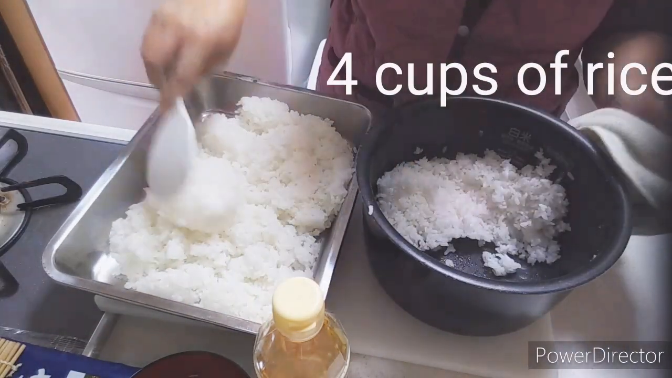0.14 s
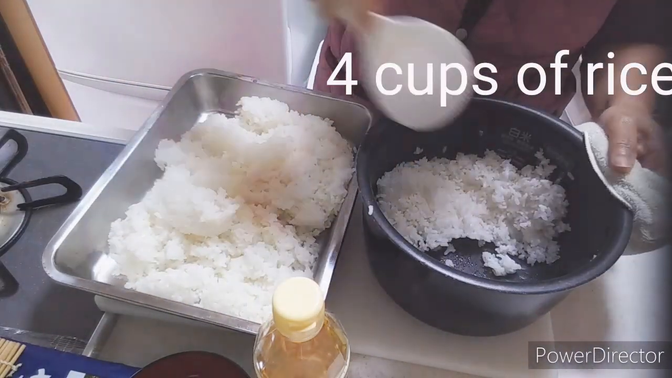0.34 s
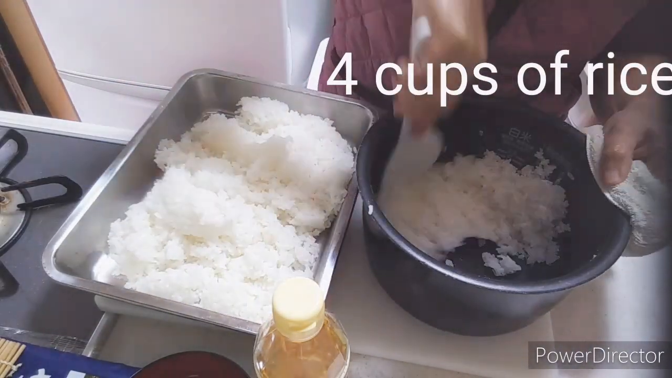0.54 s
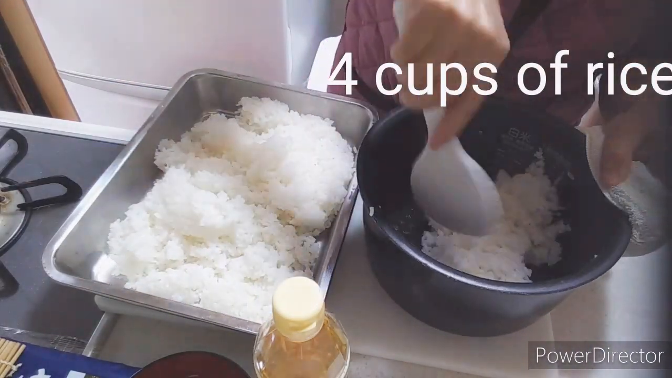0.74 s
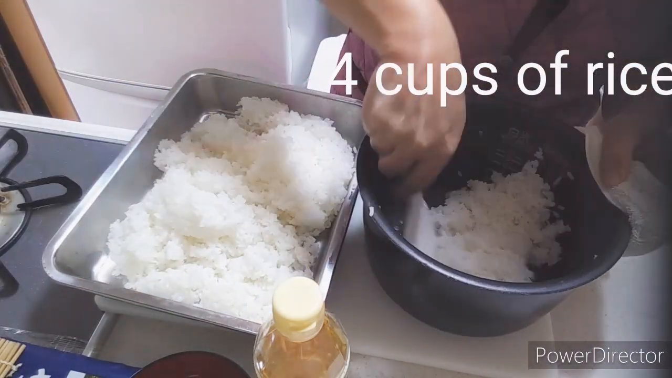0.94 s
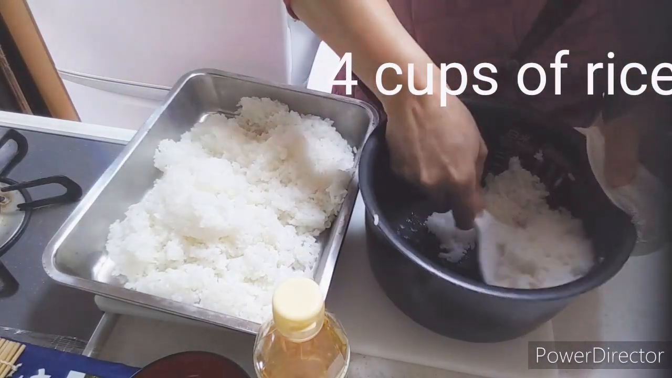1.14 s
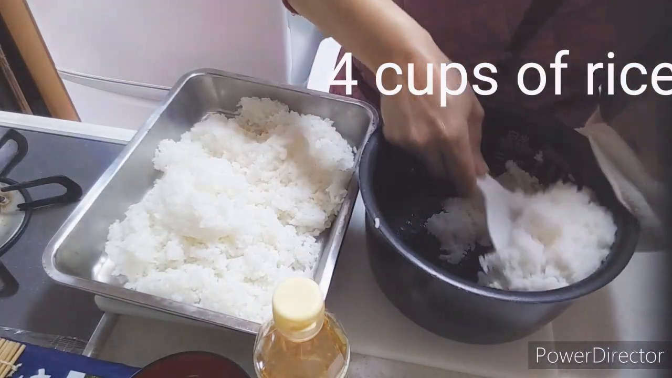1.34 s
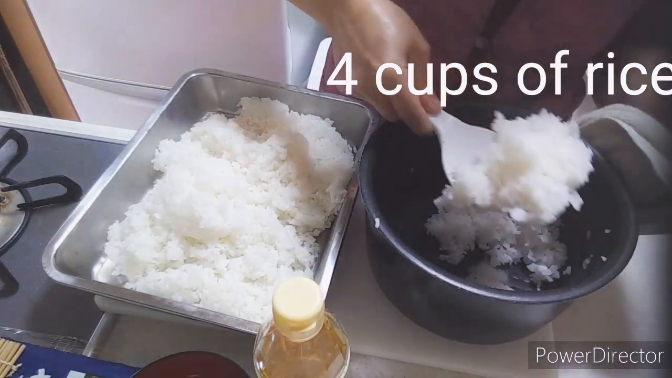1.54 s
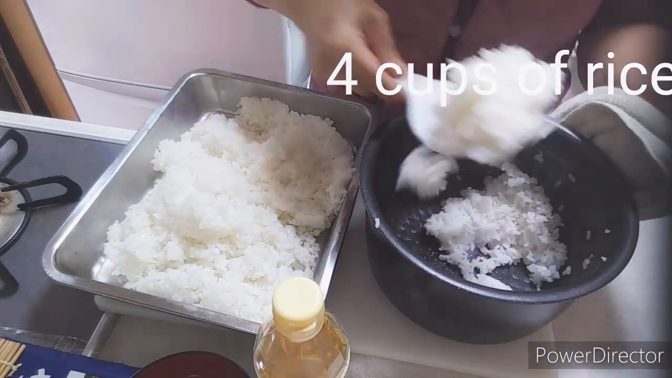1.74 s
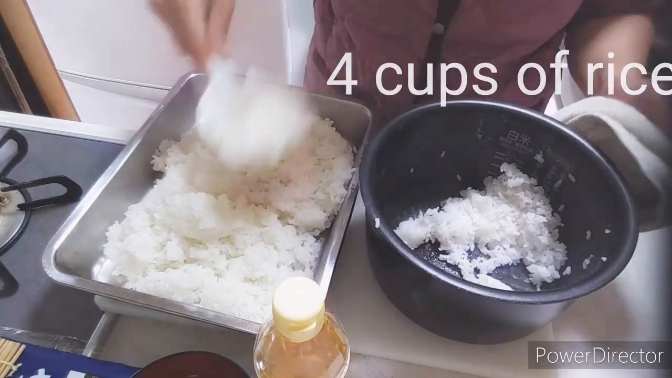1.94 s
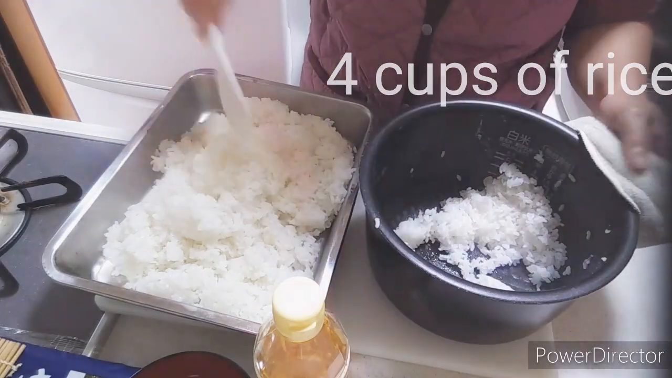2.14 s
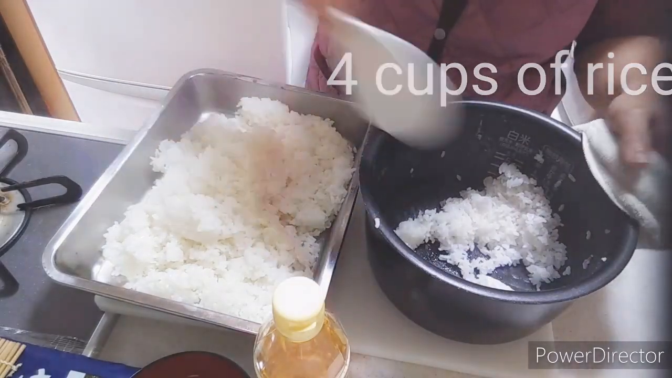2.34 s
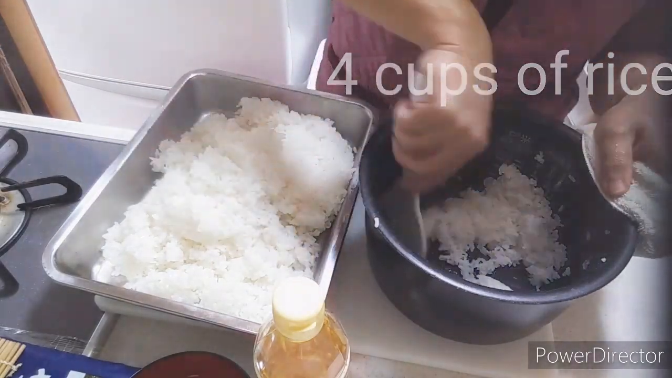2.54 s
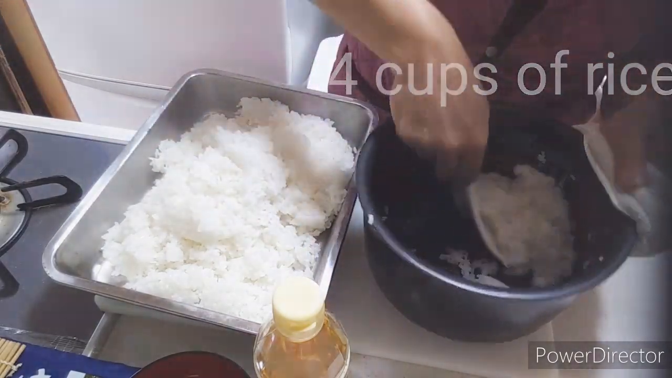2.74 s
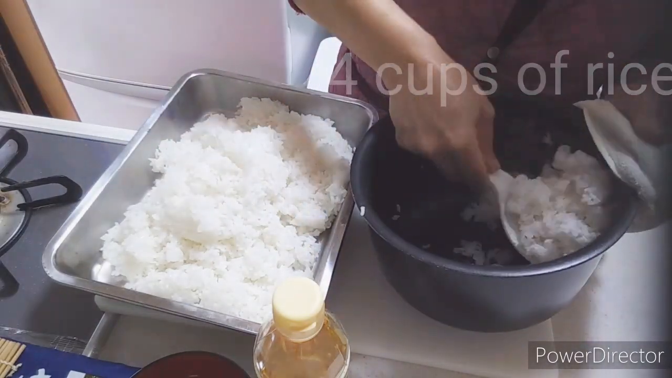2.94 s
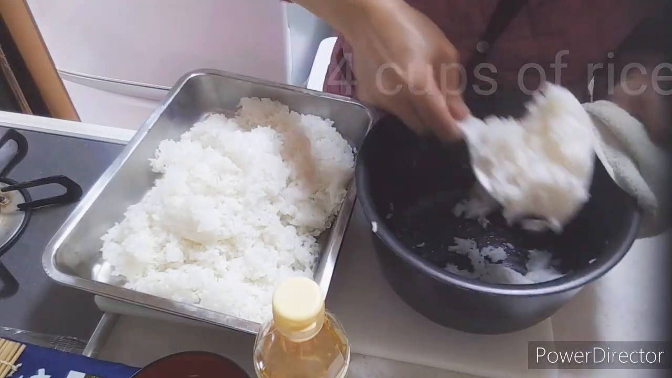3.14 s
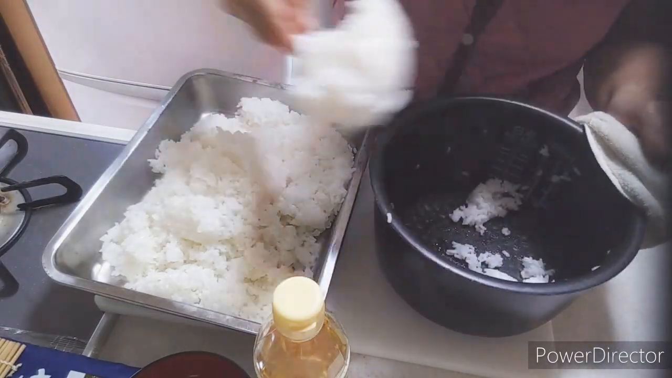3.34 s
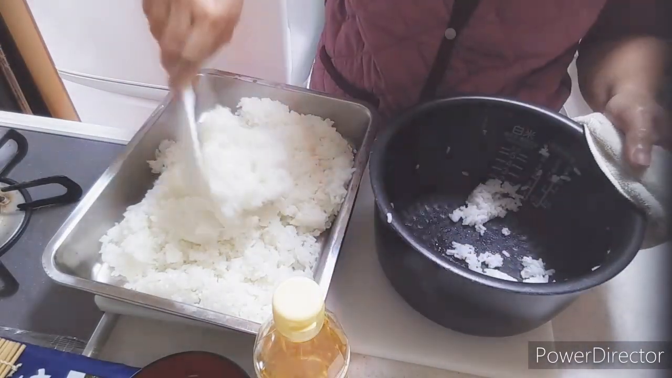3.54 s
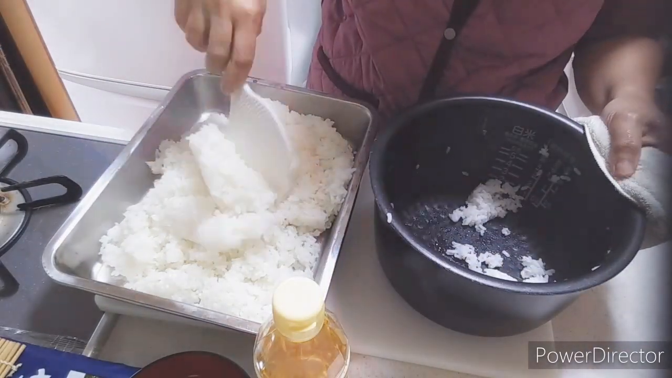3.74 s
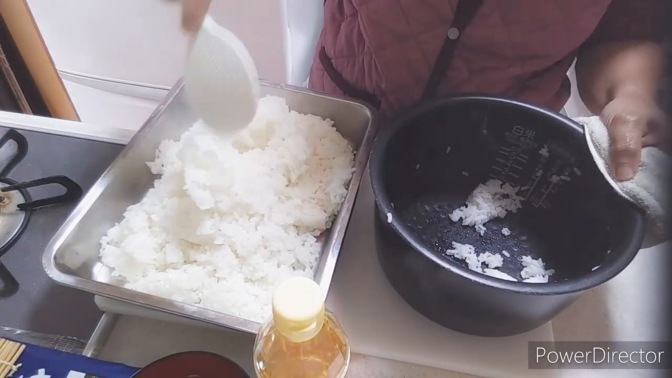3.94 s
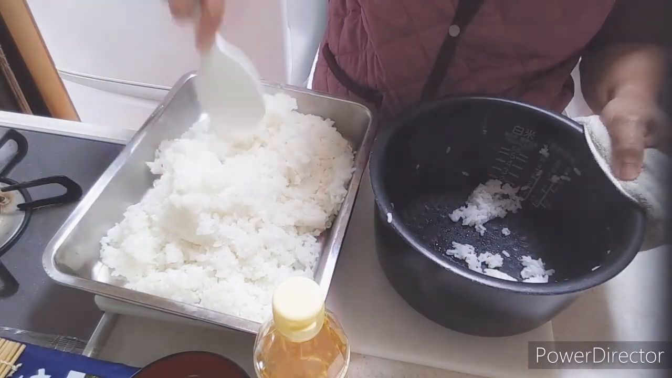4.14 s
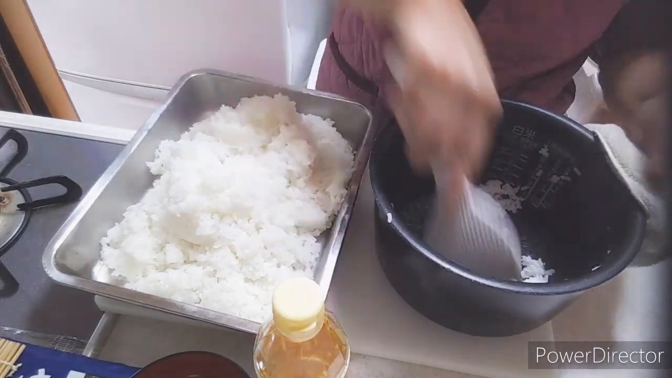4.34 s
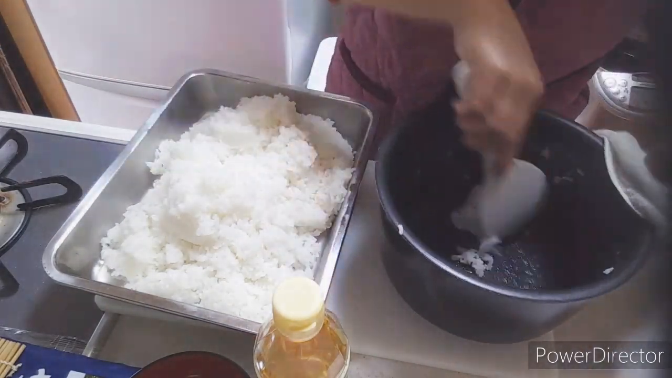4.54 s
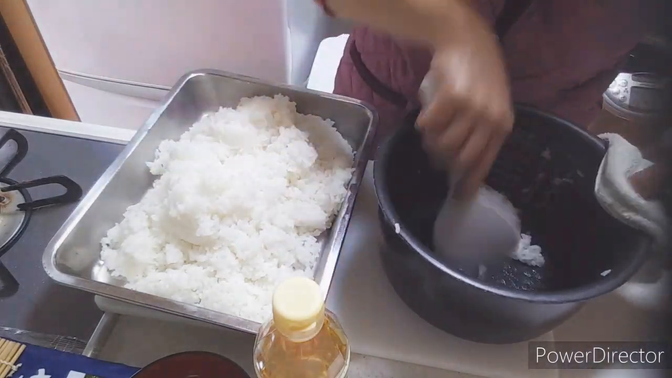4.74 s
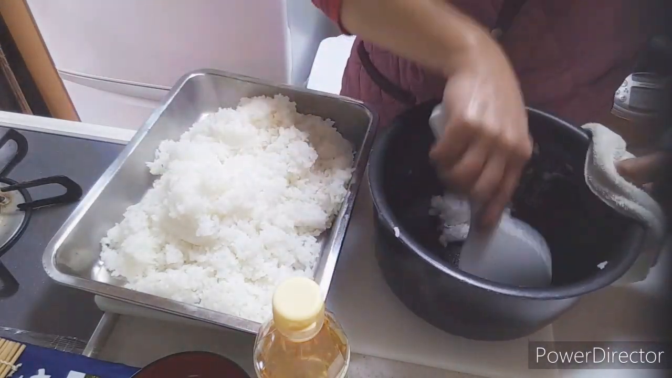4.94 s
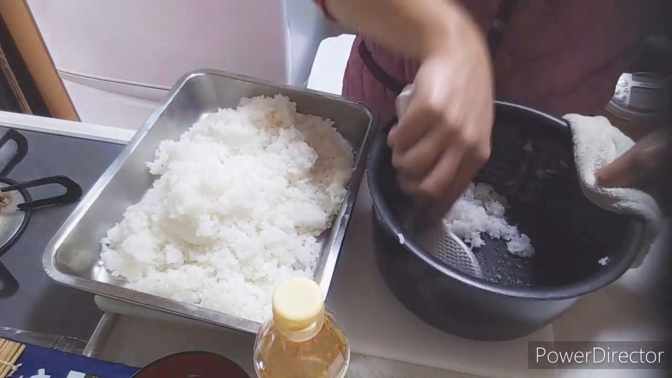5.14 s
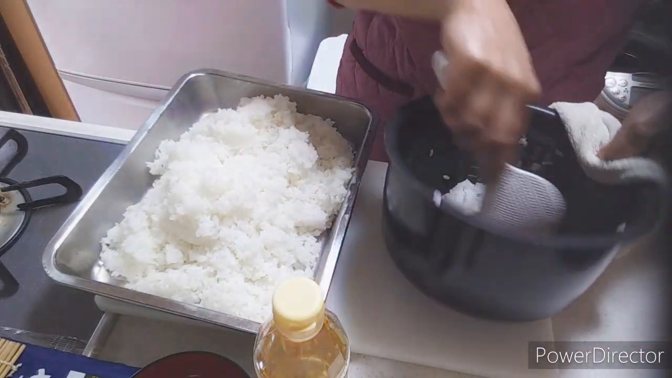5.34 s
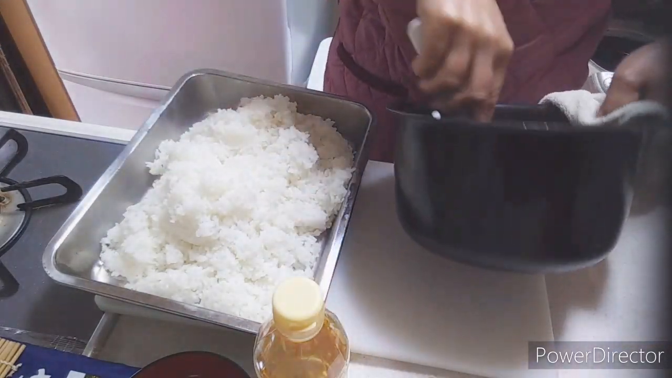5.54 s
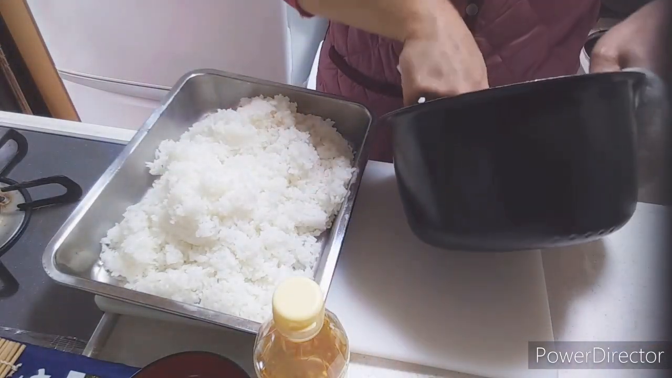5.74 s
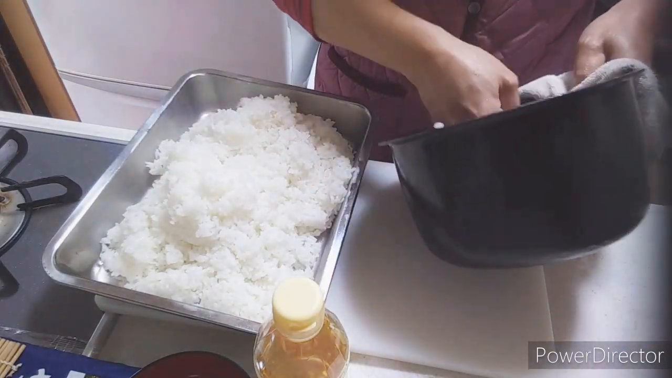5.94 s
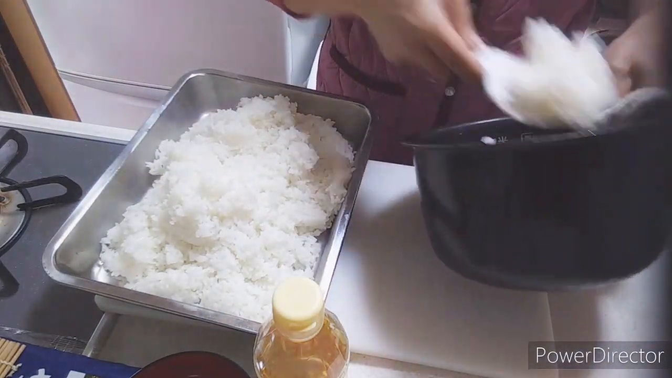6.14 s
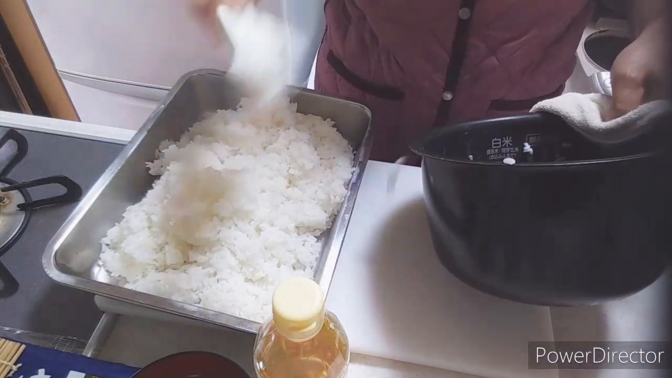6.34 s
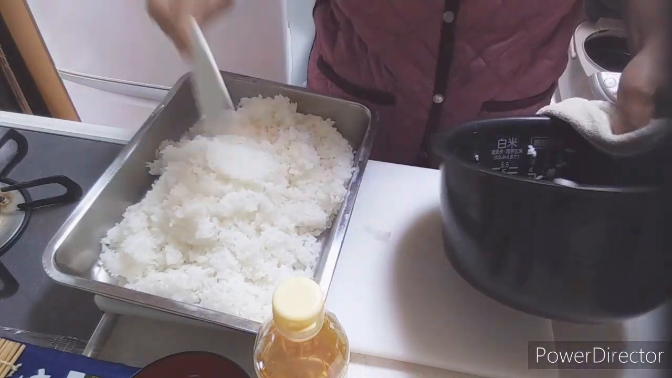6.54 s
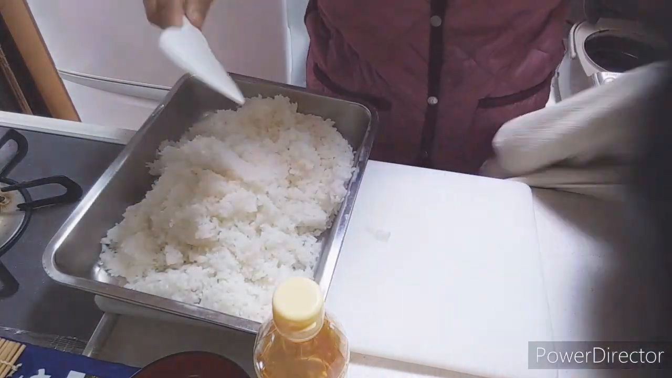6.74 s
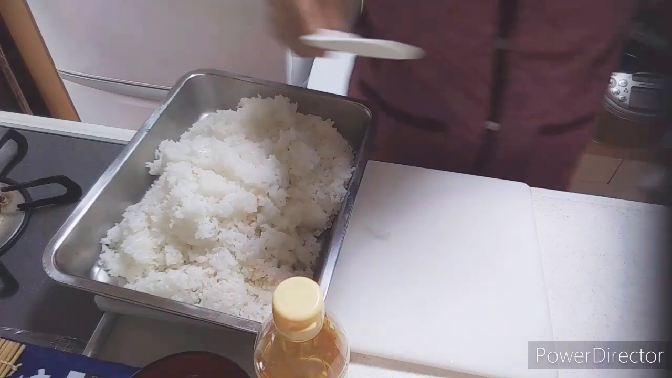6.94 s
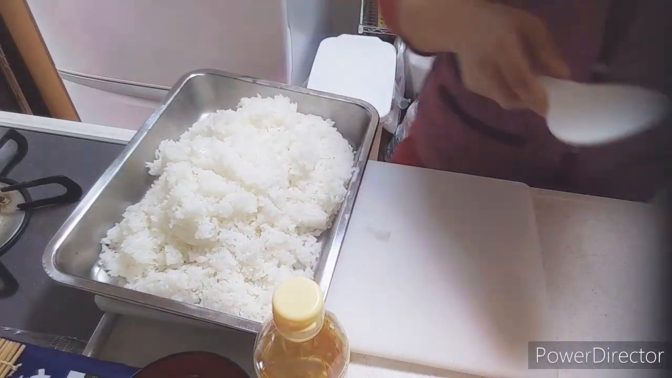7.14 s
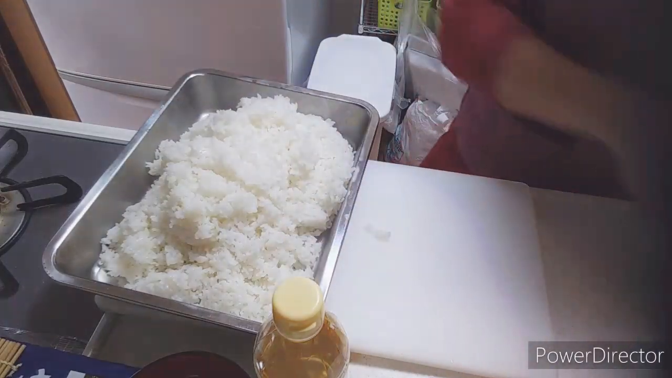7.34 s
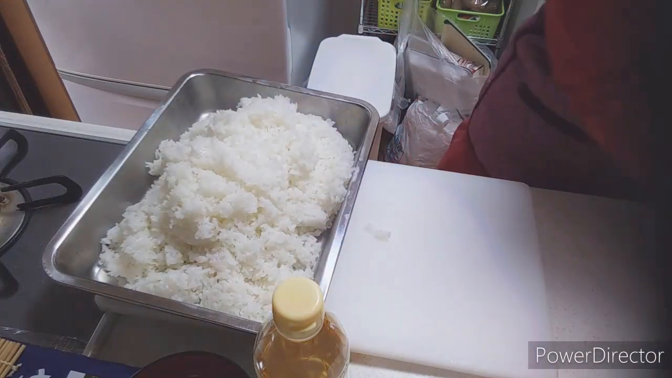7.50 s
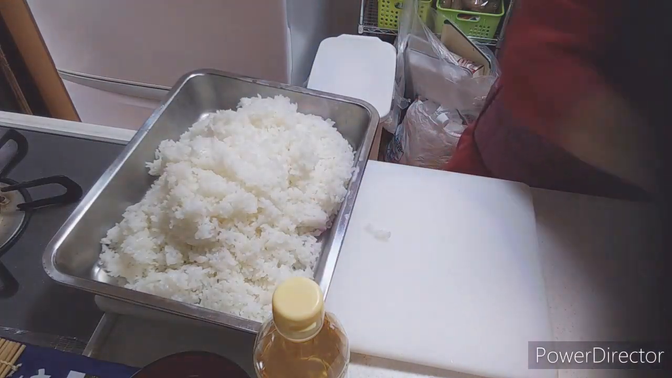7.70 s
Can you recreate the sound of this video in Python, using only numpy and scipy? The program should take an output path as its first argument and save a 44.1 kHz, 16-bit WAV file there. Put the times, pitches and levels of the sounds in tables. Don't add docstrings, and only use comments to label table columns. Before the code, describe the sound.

A plastic rice paddle knocks and scrapes in a hollow metal pot, which rings when lifted, then heavy thuds and a last bright clank.

```python
import sys
import numpy as np
from scipy import signal
from scipy.fft import rfft, irfft
from scipy.io import wavfile
from scipy.ndimage import uniform_filter1d

SR = 44100
rng = np.random.default_rng(int(sys.argv[2]) if len(sys.argv) > 2 else 0)


def master_out(mix):
    frames = np.transpose(np.atleast_2d(mix))
    ceiling = np.clip(frames, -1, 1)
    pcm = np.round(ceiling * 32767).astype(np.int16)
    wavfile.write(sys.argv[1], SR, pcm)


def undo_db(level):
    steps = np.asarray(level, float) / 20
    return 10 ** steps


N = 347059

# (f/Hz, level/dB)
HISS_SHAPE = [(18, -48), (30, -20.5), (49, -32.5), (144, -16), (225, 1.5), (443, -9.5), (546, -11.5),
              (709, -1.5), (1260, -3), (1360, -6.5), (1680, -4.5), (10700, -12), (12600, -14.5),
              (14300, -8), (15500, -6)]
HISS_DB = -62.5

# (start t/s, held/s, pressure/dB, rustle re scrape/dB)
STROKES = [(0.0, 0.016, -68.5, 4.5), (0.64, 0.1, -59.5, 5), (1.05, 0.49, -66, 3.5), (1.66, .5, -72.5, -19),
           (2.32, 0.34, -84, 15), (2.62, .55, -66, 4.5), (2.94, 0.047, -64.5, -15), (4.2, .3, -78, 11.5),
           (4.57, 0.077, -58.5, 2.5), (4.87, 0.032, -61.5, 1), (5.12, 0.033, -62.5, 6),
           (5.35, 0.069, -65.5, -3), (5.66, 0.034, -56.5, -19.5), (5.78, 0.11, -55.5, -15.5),
           (5.96, 0.147, -72.5, 11.5), (6.09, 0.039, -59.5, -8), (6.3, 0.2, -81, 14),
           (6.9, 0.077, -65, 7.5), (7.49, 0.06, -68, 15.5), (7.59, 0.092, -58, 4.5),
           (7.708, 0.18, -53, -10)]
PRESS_DB_PER_S, LET_GO_DB_PER_S = 133.5, 111
RUMBLE_DB, STILL_RUMBLE_DB = -1, -68
# (f/Hz, width/Hz, level/dB)
RUMBLE = [(161, 69, 2.7), (320, 113, 6.1), (449, 300, 2.8)]

# (f/Hz, width/Hz, level/dB)
HOLLOW = [(947, 84, -1.5), (1380, 190, 4), (1650, 430, 0), (2136, 120, 2.5), (2733, 470, -3.5),
          (3422, 74, -3), (4360, 990, -23.5), (5790, 370, -10.5)]
# (f/Hz, width/Hz, level/dB)
SHIMMER = [(6300, 900, -4), (7400, 700, -2.5), (9200, 900, 0), (10600, 1200, -4), (12700, 1500, -4),
           (14600, 1200, -4.5)]
WALL_HZ = [705, 915, 1954, 3477, 4926, 6140, 7267]
# (level/dB, t60/s)
WALL = [(-1.5, 0.16), (-9, 0.099), (-7.5, 0.25), (1.5, 0.098), (-3, 0.1), (-4.5, 0.15), (-9.5, .12)]
# (level/dB, t60/s)
FREE_WALL = [(3.5, 0.4), (-34, .3), (-32, 0.45), (7, 4.9), (4.5, 0.61), (-4, 0.81), (-15, .6)]
RIM_HZ = [8495, 9165, 9700, 10560, 11170, 11720, 12520, 12750, 13312, 14135, 14650, 15130]
# (level/dB, t60/s)
RIM = [(5, 0.064), (13, 0.038), (5.5, 0.062), (-7, 0.021), (-5.5, 0.1), (2, 0.051), (2, 0.083),
       (-10.5, 0.11), (-9, 0.057), (-1, 0.062), (-1, 0.09), (3, .07)]
LIFTED_HZ = [940, 1700, 1746, 1811, 1900, 2030, 3316, 5560, 5712, 5986, 6831, 8850, 9609, 10750, 12000,
             13510, 14600]
# (level/dB, t60/s)
LIFTED_WALL = [(-11, 0.06), (-17, 0.0084), (-18, 0.056), (8, 0.08), (-12, 0.21), (-20.5, 0.18), (-18, 0.13),
               (-13.5, 0.091), (-17, 0.12), (-24, 0.075), (-27, .07), (-40.5, 0.072), (-35, 0.071),
               (-38.5, .08), (-47.5, 0.082), (-37.5, 0.041), (-37.5, 0.088)]
RUBBED_HZ = [1830, 3300, 5560, 6820, 8580, 8850, 9460, 10700, 12000, 12600, 14400, 14600]
# (width/Hz, level/dB)
RUBBED_WALL = [(24.5, -3), (87, -13), (22.17, -12), (35, -26), (50.6, -26), (35.3, -24.5), (39.45, -27),
               (30, -29), (39.9, -25), (50, -29), (39.46, -29), (35.25, -27.5)]

# (t/s, clack level/dB, clack f/Hz, tick re clack/dB, clack t60/s)
RIM_BLOWS = [
    (0.608, -31, 2090, -2, 0.074),
    (0.657, -47.5, 1960, 9.5, 0.087),
    (1.362, -60.5, 2280, -1, 0.14),
    (3.159, -61, 1880, -1, 0.065),
    (7.767, -31.5, 3110, 7, 0.27),
]
# (t/s, clack level/dB, clack f/Hz, tick re clack/dB)
WALL_BLOWS = [(1.221, -50, 3070, -4.5), (1.945, -50.5, 3200, -8), (2.3, -56.5, 3100, -5),
              (2.6285, -34, 960, -6.5), (2.714, -30, 944, -12), (2.7555, -30.5, 1700, -13),
              (2.778, -41, 2200, -10), (2.858, -56, 1900, -9), (2.925, -75, 3200, 3),
              (3.84, -51.5, 1600, -1), (5.025, -52, 2240, -11.5), (5.086, -17.5, 937, -13),
              (5.089, -18.5, 2750, -36), (5.147, -31.5, 1640, -17), (5.157, -28.5, 1650, -9.5),
              (5.345, -25, 1820, -11.5), (5.354, -24.5, 1650, -31), (6.961, -46.5, 3010, -7.5)]
# (t/s, clack level/dB, clack f/Hz, tick re clack/dB)
BOTTOM_BLOWS = [(0.748, -40.5, 1220, -6), (0.763, -48, 1210, -2), (1.064, -35, 1620, -2),
                (1.0655, -31.5, 3280, -14.5), (1.075, -41, 3100, -20), (1.701, -41, 3110, -30),
                (4.565, -38.5, 2100, -10), (4.623, -31, 890, -17), (4.633, -27.5, 940, -21),
                (4.6395, -25, 970, -21), (4.854, -26, 980, -8), (4.911, -33.5, 1530, -6.5),
                (5.124, -22, 1660, -17), (5.296, -31.5, 1640, -2), (5.3465, -21, 3274, -18),
                (6.557, -44.5, 1260, -36), (7.7615, -35.5, 1570, -15)]
# (t/s, clack level/dB, clack f/Hz, tick re clack/dB)
PATS = [(0.426, -59, 1880, -8), (1.162, -52.5, 740, -18), (1.189, -50.5, 1280, -11),
        (1.277, -53.5, 1200, -21), (1.329, -62, 930, -3), (1.643, -60, 2080, -23),
        (1.661, -51.5, 1280, -13), (1.992, -51.5, 1240, -13), (2.122, -58.5, 2520, -9),
        (3.269, -61, 905.5, -18), (6.727, -56, 2710, -27), (7.13, -57.5, 845, -25),
        (7.386, -55, 870, -25.5)]
# (t/s, tick level/dB)
CRUMBS = [
    (0.809, -67),
    (0.829, -79),
    (0.869, -61),
    (0.908, -88),
    (1.15, -57),
    (1.499, -63),
    (2.34, -65),
    (4.227, -64),
]
CRUMB_HZ, CRUMB_CLACK_DB = 1210, -15
# (t/s, clack level/dB, clack f/Hz, tick re clack/dB, wall ring re clack/dB)
TAPS = [
    (0.6105, -40, 3360, 11.5, 14.5),
    (1.015, -51.5, 710, 4.5, 4.5),
    (4.54, -33, 2090, 8, -14),
    (4.5435, -42.5, 5900, 18.5, 7),
    (4.549, -52, 7300, 23, 1),
    (7.835, -48.5, 3480, 11, -2),
    (1.018, -67.5, 4930, 2, 12),
    (2.632, -51.5, 7200, 11, 7),
    (2.706, -59, 4900, 0, 6),
]
# (t/s, clack level/dB, clack f/Hz, tick re clack/dB)
SET_DOWN = [
    (7.5065, -31, 3300, 2.5),
    (7.5219, -34.5, 3470, -6),
    (7.675, -48, 3350, 4.5),
    (7.7248, -38, 2250, -0.5),
]
# (t/s, clack level/dB, clack f/Hz, tick re clack/dB)
SLIDES = [(0.647, -39, 930, -14), (1.1, -55, 1700, -21), (1.13, -60, 2800, -14), (1.29, -55, 1270, -18),
          (1.32, -60, 2240, -10), (1.375, -69, 2100, -4), (0.743, -43, 947, -14), (2.679, -46, 1370, -6),
          (2.697, -36.5, 2050, -7.5), (2.704, -40, 4250, -8), (2.725, -42, 2360, -10),
          (2.734, -36.5, 930, -19), (2.744, -45, 2500, -10), (2.767, -37.5, 2100, -13),
          (2.94, -53, 1250, -14), (2.958, -52.5, 1220, -14), (2.975, -54, 1500, -14),
          (2.999, -51.5, 920, -25), (4.6, -39.5, 920, -14), (4.617, -33, 960, -17), (4.65, -36, 1415, -10),
          (4.662, -46.5, 2090, -5), (4.675, -42, 1860, -9), (4.87, -36, 1200, -13), (4.888, -40, 3260, -8),
          (4.917, -33.5, 2540, -16), (4.929, -45, 1490, -20), (5.137, -26, 1650, -15),
          (5.168, -34.5, 1670, -14), (5.302, -33.5, 920, -9), (5.312, -42, 990, -22),
          (5.33, -37.5, 950, -19), (5.365, -28, 1790, -15), (5.382, -32.5, 1750, -11),
          (5.399, -44, 1750, -2), (5.578, -32, 3270, -25), (5.586, -40, 3300, -25)]
# (t/s, ring level/dB, tick re ring/dB, clack re ring/dB)
LIFTED_KNOCKS = [(5.481, -49.5, -40, -19), (5.547, -10, -28.5, -15), (5.55, -16, -21, -14.5),
                 (5.5718, -16, -25, -15), (5.576, -27.5, -20, -10), (5.5844, -22, -28, -11),
                 (5.5892, -23, -34, -23), (5.5932, -14.5, -25, -21), (5.746, -36.5, -34, -16),
                 (5.7944, -33, -13, 7), (5.85, -44.5, -6, 1), (6.421, -64.5, -2, 8), (7.1308, -57, -10, -8),
                 (7.192, -66.5, -17.5, -12), (7.212, -66, -20, -15), (7.232, -67, -20, -15),
                 (7.387, -55.5, -21.5, -17.5)]
LIFTED_CLACK_HZ, LIFTED_CLACK_T60_S = 1780, 0.11
GRIP_DB_PER_S = 3000

# (wall ring re clack/dB, clack t60/s); the edge only t60/s
ON_WALL, ON_BOTTOM, IN_RICE = (-13.5, 0.099), (-27.5, 0.1), (-40, 0.18)
ON_EDGE, RATTLE, SLIDING = (0.11,), (-12, 0.14), (-23.5, 0.08)
CRACK_DB, CRACK_T60_S = 3, 0.02
CLICK_DB, PASSING_DB = 28, -4
GRIT_DB, WALL_SCATTER_DB = 3.6, 1.8
FAVOUR_DB_PER_OCTAVE, FOCUS_DB_PER_OCTAVE = -4, -2.5
SLIDE_RISE_S = 0.0035

# (t/s, level/dB, slap re level/dB, f/Hz)
THUDS = [(0.611, -35.5, 3.5, 406), (0.748, -42, 0, 338), (1.019, -39, -8, 166), (1.066, -45, -8, 151),
         (1.165, -42.5, -2, 211), (2.627, -43, -14, 377), (2.761, -34, -7, 262), (2.798, -46, -16, 151),
         (3.446, -31.5, -9, 332), (3.471, -32, -17, 208), (4.546, -36, 0.5, 161), (4.573, -36, -11, 152),
         (4.63, -36.5, -12, 158), (4.657, -39.5, -15, 153), (4.854, -32.5, -5, 302),
         (5.086, -28.5, -24, 300), (5.126, -40, -21, 153), (5.298, -36.5, -29, 493),
         (5.341, -41.5, -11, 250), (5.8, -47.5, 6, 348), (7.506, -14.5, -10.5, 330),
         (7.514, -16.5, -11.5, 520), (7.724, -17, -10.5, 340)]
THUD_T60_S = 0.12
# (f/Hz, level/dB, t60/s)
COUNTER = [(158.8, 3, 0.2), (218, -1, 0.2), (299, 11, 0.038), (395.5, 11, 0.024), (489, 5, 0.035),
           (834, -36.5, .03)]
# (f/Hz, width/Hz, level/dB)
SLAP = [(473.4, 11.3, 3.5), (710, 20, 10.5), (920, 53, 10.5), (1260, 97, -0.5)]

# (t/s, level/dB)
JOLTS = [(2.7988, -53), (2.835, -62), (2.8589, -57), (2.89, -57), (2.9248, -56), (2.98, -62), (3.197, -61),
         (3.265, -71), (7.506, -35), (7.5598, -59), (7.6842, -62)]
# (level/dB, t60/s)
TRAY_HZ = [3262, 3295]
TRAY = [(11, 0.23), (-13, 0.15)]

# (t/s, level/dB)
LIFTED_SING = [
    (5.62, -70),
    (5.712, -69),
    (5.748, -45),
    (5.79, -43),
    (5.834, -51),
    (5.862, -48),
    (5.952, -55.5),
    (6.115, -55),
    (6.19, -97),
]
# (t/s, level/dB)
SING = [
    (7.77, -36),
    (7.786, -34.5),
    (7.814, -43),
    (7.835, -34.5),
    (7.87, -42),
]
# (f/Hz, width/Hz, level/dB)
FREE_EXTRA = [(1570, 22, -5.5), (2020, 190, -11.0), (2080, 22, -30)]
FREE_BLOW_S, FREE_RING_DB, FREE_RIM_DB = 7.766, -32.5, -47

TOP_HZ = 15500


def unit(x):
    return x / np.sqrt(np.mean(x ** 2))


def curve(rows):
    s, db = np.transpose(rows)
    after = db[-1] if s[-1] * SR > N - 99 else -150
    return undo_db(np.interp(np.arange(N) / SR, s, db, left=-150, right=after))


def resonate(x, peaks):
    out = 0
    for k, (hz, width, db) in enumerate(peaks):
        b, a = signal.iirpeak(hz, hz / max(width, 5), SR)
        out = out + (-1) ** k * undo_db(db) * signal.lfilter(b, a, x)
    return out


def ring(hz, modes, t, scatter_db):
    db, t60 = np.array(modes).T[:, :, None]
    share = undo_db(db + scatter_db * rng.standard_normal((len(modes), 1)))
    fade = undo_db(-60 * t / np.maximum(t60, 0.01))
    return np.sum(share * fade * np.sin(2 * np.pi * np.array(hz)[:, None] * t), 0)


def strike(response, rise_s):
    return response * (1 - np.exp(-np.arange(len(response)) / SR / rise_s))


def add(out, s, x, db):
    i = int(s * SR)
    peak = np.max(uniform_filter1d(x ** 2, 180)) ** 0.5
    out[i:i + len(x)] += (undo_db(db) * x / peak)[:N - i]


def grit(shape, spread_db):
    return rng.standard_normal(shape) * undo_db(spread_db * np.minimum(rng.exponential(size=shape), 4))


def grains(rate, spread_db):
    return (rng.random(N) < rate / SR) * grit(N, spread_db)


def flutter(rate, depth_db):
    k = int(SR / rate)
    held = np.repeat(rng.standard_normal(N // k + 1), k)[:N]
    return undo_db(depth_db * uniform_filter1d(held, k))


def hiss():
    hz, db = np.transpose(HISS_SHAPE)
    shape = undo_db(np.interp(np.log(np.fft.rfftfreq(N, 1 / SR) + 1), np.log(hz), db))
    noise = irfft(rfft(rng.standard_normal(N)) * shape, N)
    return undo_db(HISS_DB) * flutter(2.8, 0.63) * unit(noise)


def strokes():
    t = np.arange(N) / SR
    s, held, db, rustle_db = np.transpose(STROKES)[:, :, None]
    press = PRESS_DB_PER_S * np.maximum(s - t, 0)
    let_go = LET_GO_DB_PER_S * np.maximum(t - s - held, 0)
    power = undo_db(db - press - let_go) ** 2
    return np.sqrt(power.sum(0)), np.sqrt((power * undo_db(rustle_db) ** 2).sum(0))


def rubbing():
    scrape, rustle = strokes()
    rumble = np.hypot(scrape * undo_db(RUMBLE_DB), undo_db(STILL_RUMBLE_DB))
    hollow = resonate(grains(2300, 1.5) * flutter(45, 3.5), HOLLOW)
    b, a = signal.butter(2, 4500, "high", fs=SR)
    fine = signal.lfilter(b, a, grains(5700, 0.91) * flutter(48, 1.3))
    low = resonate(rng.standard_normal(N) * flutter(25, 3.15), RUMBLE)
    return scrape * unit(hollow) + rustle * unit(fine) + rumble * unit(low)


def passing_tones():
    pitches = 700 * 2 ** (3.11 * (np.arange(8) + rng.random(8)) / 8)
    return [(f, f / 14, PASSING_DB - 3.7 * np.log2(f / 900)) for f in pitches]


def blows(rows, wall_hz, wall, scatter_db, click_db, rise_s, ring_rise_s, grip_db_per_s):
    out, t = np.zeros(N), np.arange(SR // 4) / SR
    for (s, db, hz, tick_db, ring_db, t60), (next_s, *_) in zip(rows, rows[1:] + [[N]]):
        crack = undo_db(CRACK_DB - 60 * t / CRACK_T60_S)
        clack = undo_db(-60 * t / max(t60, 0.01))
        kitchen = undo_db(-36 - 60 * t / 0.7)
        chatter = grit((2, len(t)), GRIT_DB) * strike(crack + clack + kitchen, rise_s)
        chatter[:, 0] += undo_db(click_db)

        near = [(f, width, gain_db + FOCUS_DB_PER_OCTAVE * abs(np.log2(f / hz)))
                for f, width, gain_db in HOLLOW + passing_tones()]
        add(out, s, resonate(chatter[0], near + [(hz, 100, 9)]), db)
        add(out, s, resonate(chatter[1], SHIMMER), db + tick_db - 1.5)
        add(out, s, strike(ring(RIM_HZ, RIM, t, 2.2), 0.0018 + rise_s), db + tick_db - 5.0)

        favoured = [(gain_db + FAVOUR_DB_PER_OCTAVE * abs(np.log2(f / hz)), fade_s)
                    for f, (gain_db, fade_s) in zip(wall_hz, wall)]
        wall_ring = strike(ring(wall_hz, favoured, t, scatter_db), ring_rise_s)
        gripped = undo_db(-grip_db_per_s * np.maximum(t - (next_s - s), 0))
        add(out, s, gripped * wall_ring, db + ring_db)
    return out


def landed(rows, spot):
    return [(*row, *spot) for row in rows]


def standing_pot():
    rim = [(s, db, hz, tick, tick, t60) for s, db, hz, tick, t60 in RIM_BLOWS]
    crumbs = [(s, db + CRUMB_CLACK_DB, CRUMB_HZ, -CRUMB_CLACK_DB) for s, db in CRUMBS]
    knocks = rim + landed(WALL_BLOWS, ON_WALL) + landed(BOTTOM_BLOWS, ON_BOTTOM)
    knocks = sorted(knocks + landed(PATS + crumbs, IN_RICE))
    rows = knocks + landed(TAPS, ON_EDGE) + landed(SET_DOWN, RATTLE)
    return blows(rows, WALL_HZ, WALL, WALL_SCATTER_DB, CLICK_DB, 0.0001, 0.0008, 0)


def thuds():
    out, t = np.zeros(N), np.arange(SR // 3) / SR
    modes_hz, modes_db, modes_t60 = np.transpose(COUNTER)
    for s, db, slap_db, hz in THUDS:
        rattle = rng.standard_normal(len(t)) * undo_db(-60 * t / THUD_T60_S)
        rattle[0] += 8.0
        nearness = -14 * np.abs(np.log2(modes_hz / hz))
        body = ring(modes_hz, np.transpose([modes_db + nearness, modes_t60]), t, 1.17)
        add(out, s, signal.fftconvolve(rattle, body)[:len(t)], db - 5.5)
        slap = resonate(resonate(rattle, SLAP), [(800, 1400, 0)])
        add(out, s, slap, db - 6 + slap_db)
    return out


def sliding_contacts():
    rows = landed(SLIDES, SLIDING)
    return blows(rows, WALL_HZ, WALL, WALL_SCATTER_DB, -19.5, SLIDE_RISE_S, SLIDE_RISE_S, 0)


def tray():
    out, t = np.zeros(N), np.arange(SR // 3) / SR
    for s, db in JOLTS:
        add(out, s, strike(ring(TRAY_HZ, TRAY, t, 2.5), 0.0036), db - 11)
    return out


def lifted_pot():
    rows = [(s, db + clack, LIFTED_CLACK_HZ, tick - clack, -clack, LIFTED_CLACK_T60_S)
            for s, db, tick, clack in LIFTED_KNOCKS]
    return blows(rows, LIFTED_HZ, LIFTED_WALL, 0.55, 31, 0.000301, 0.0016, GRIP_DB_PER_S)


def unit_gain(peaks):
    return np.std(resonate(grains(1100, 2.84), peaks))


def singing():
    held = [(hz, *mode) for hz, mode in zip(RUBBED_HZ, RUBBED_WALL)]
    slips = grains(2500, 2.3) * flutter(35, 3.3) * curve(LIFTED_SING)
    lifted = sum(flutter(40, 2.9) * resonate(slips, [mode]) for mode in held)
    out = undo_db(-1.5) * lifted / unit_gain(held)

    t = np.arange(SR // 3) / SR
    add(out, FREE_BLOW_S, strike(ring(WALL_HZ, FREE_WALL, t, 0), 0.00096), FREE_RING_DB)
    long_rim = np.array(RIM) * [1, 4.0]
    add(out, FREE_BLOW_S, strike(ring(RIM_HZ, long_rim, t, 3.4), 0.0021), FREE_RIM_DB)

    free = [(hz, 14, db) for hz, (db, _) in zip(WALL_HZ, FREE_WALL)] + FREE_EXTRA
    free += [(hz, 30, db - 26) for hz, (db, _) in zip(RIM_HZ, RIM)]
    return out + undo_db(3.0) * resonate(grains(4000, 1.7) * curve(SING), free) / unit_gain(free)


def scene():
    near = standing_pot() + thuds() + sliding_contacts() + tray() + lifted_pot() + singing()
    no_bass = signal.butter(3, 125, "high", fs=SR, output="sos")
    return (signal.sosfilt(no_bass, near) + rubbing() + hiss())[None]


def top_cut(x):
    return signal.sosfilt(signal.butter(12, 16490, fs=SR, output="sos"), x)


def record(dry):
    low_pass = signal.ellip(10, 0.1, 40, TOP_HZ, fs=SR, output="sos")
    kept = signal.sosfiltfilt(low_pass, dry)
    top = dry - kept
    loudness = uniform_filter1d(top ** 2, 512)
    gate = undo_db(-12) * loudness / (loudness + undo_db(-52) ** 2)
    return top_cut(kept + top * gate)


dry = scene()
out = record(dry)
master_out(out)
```